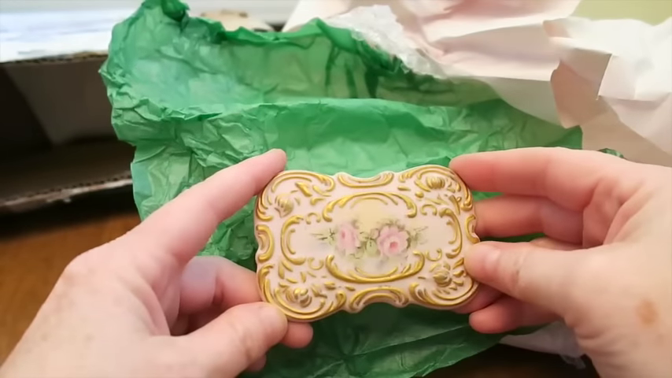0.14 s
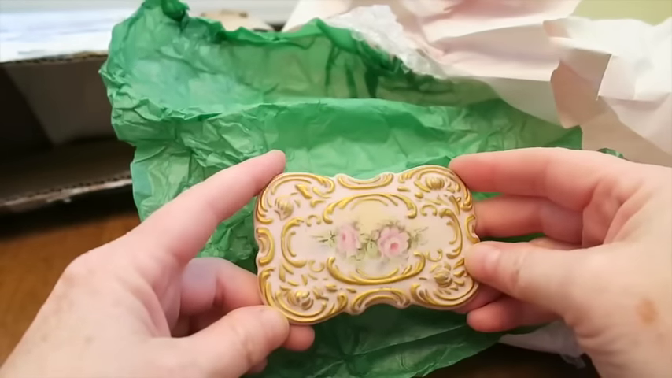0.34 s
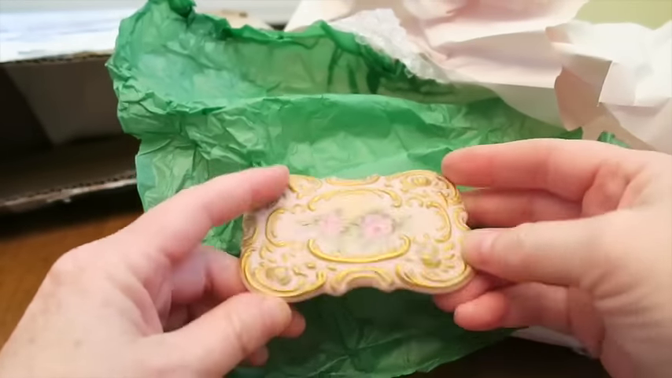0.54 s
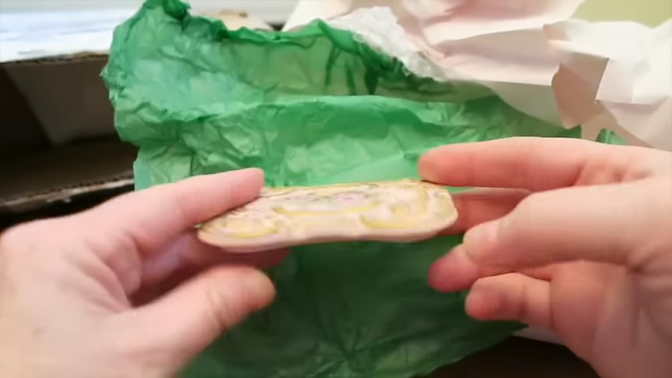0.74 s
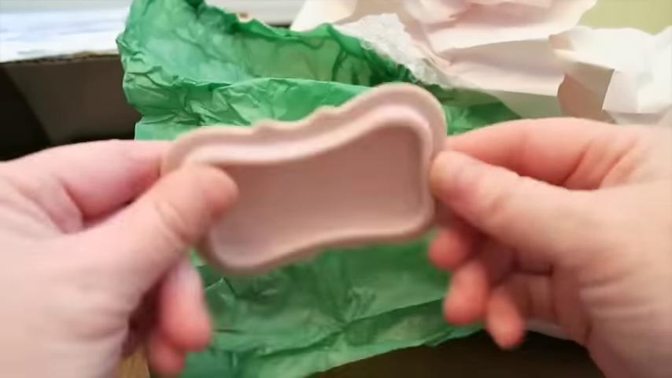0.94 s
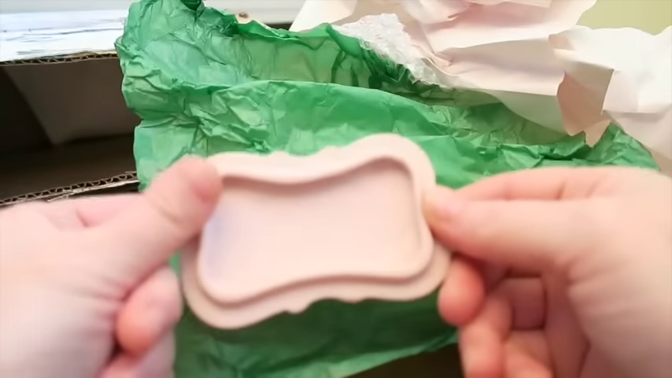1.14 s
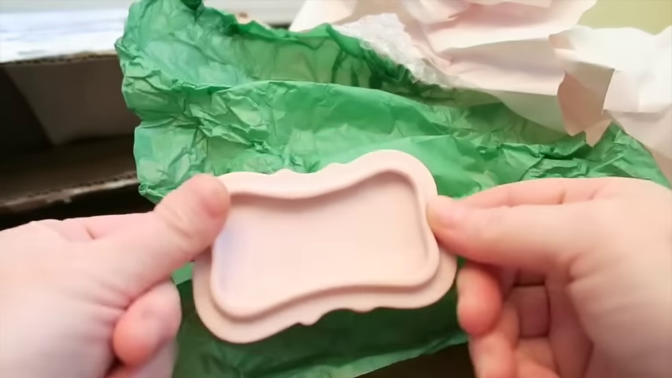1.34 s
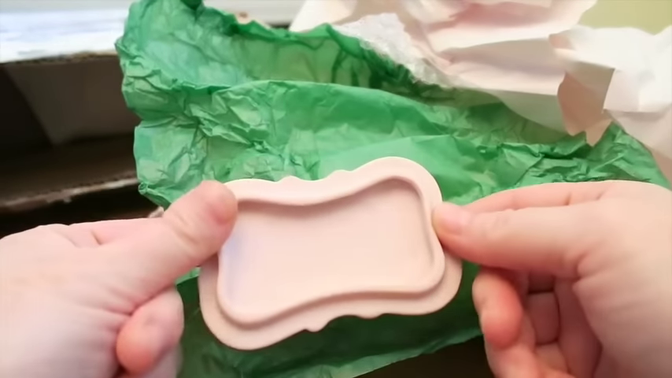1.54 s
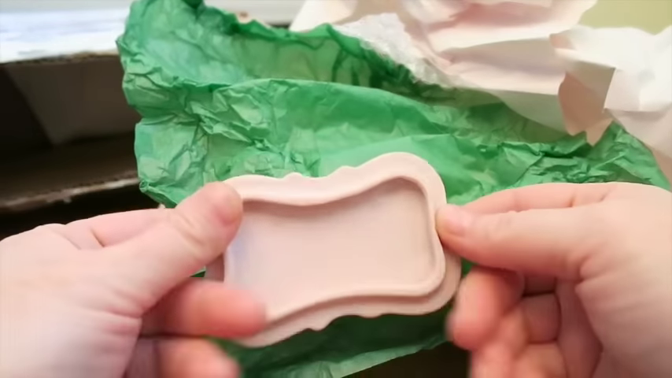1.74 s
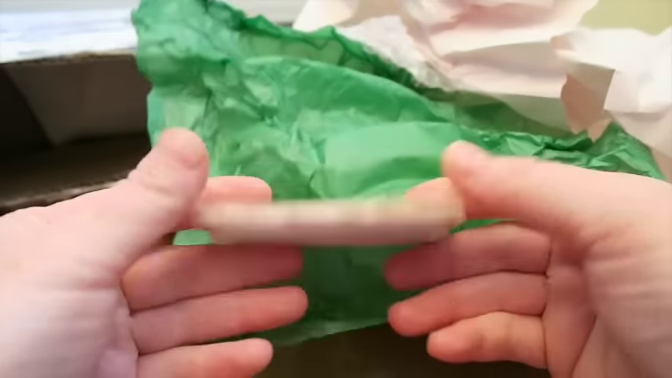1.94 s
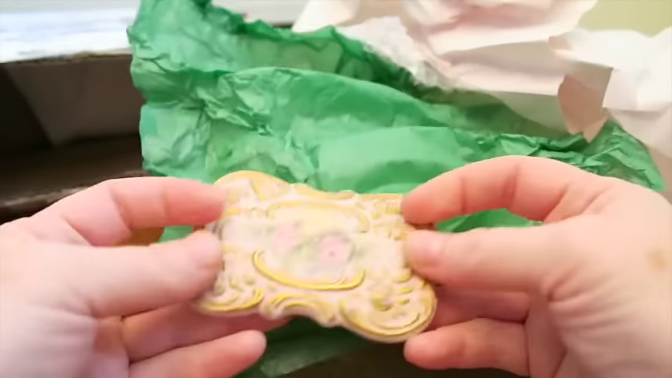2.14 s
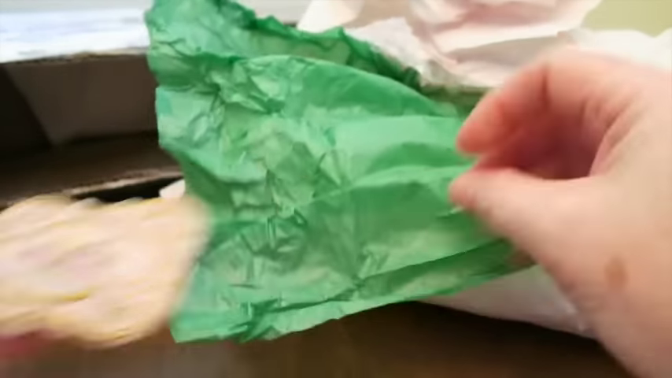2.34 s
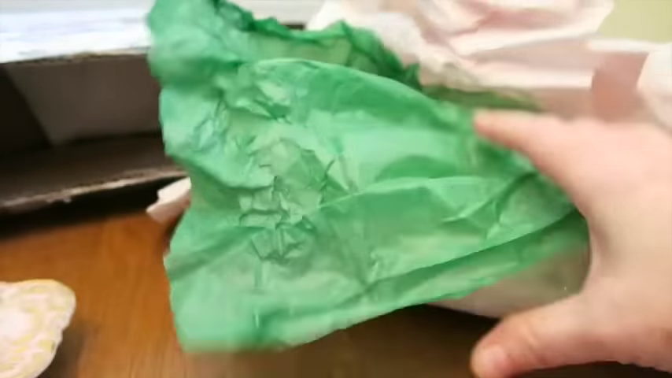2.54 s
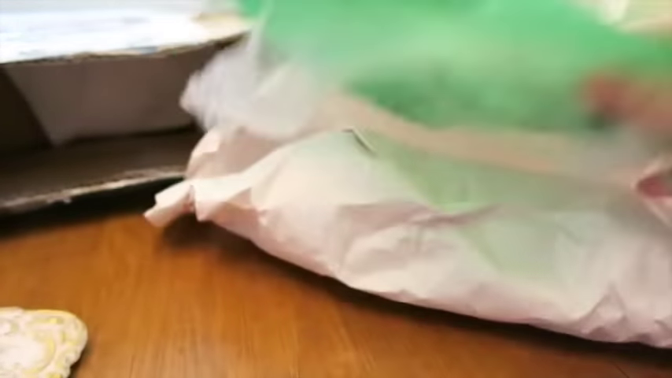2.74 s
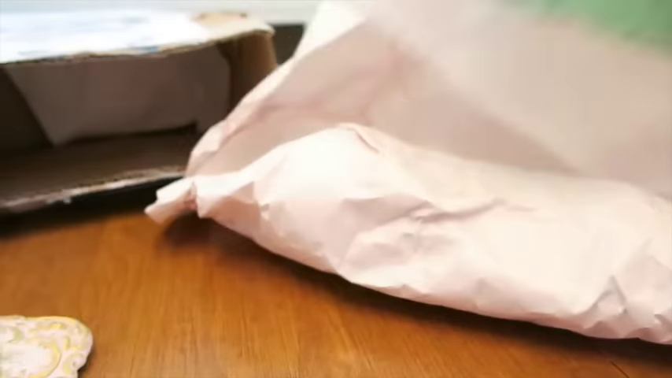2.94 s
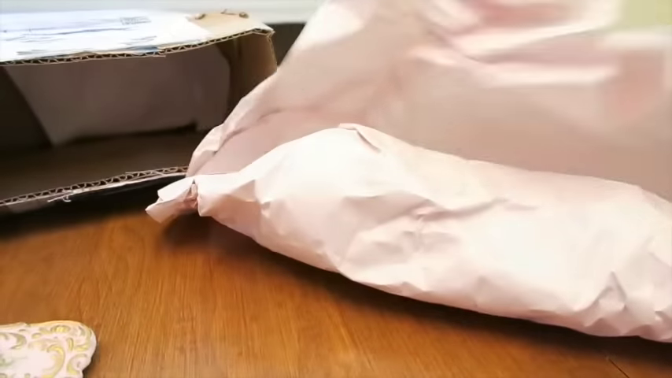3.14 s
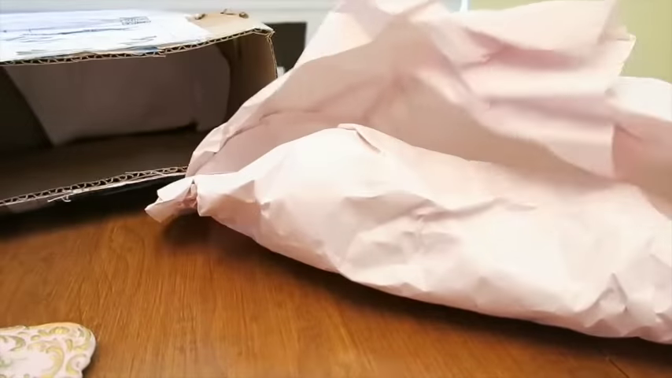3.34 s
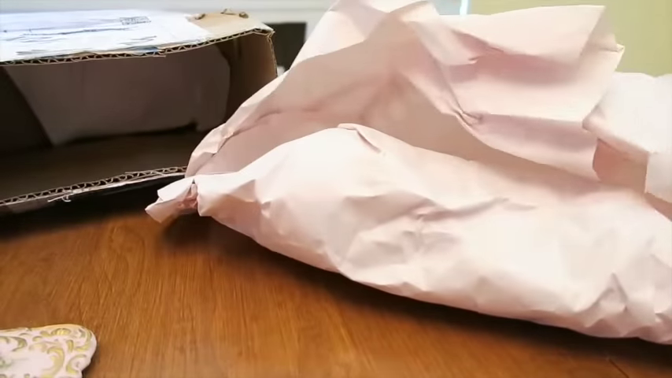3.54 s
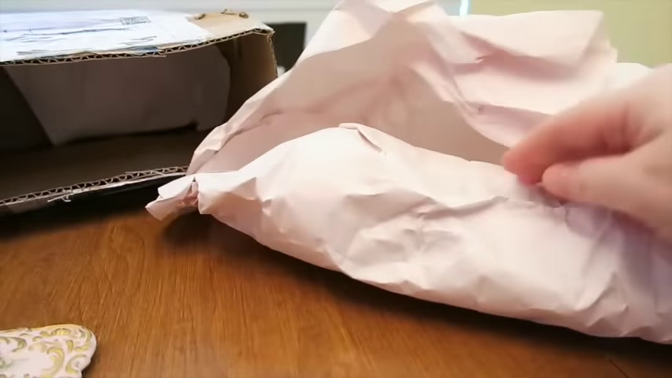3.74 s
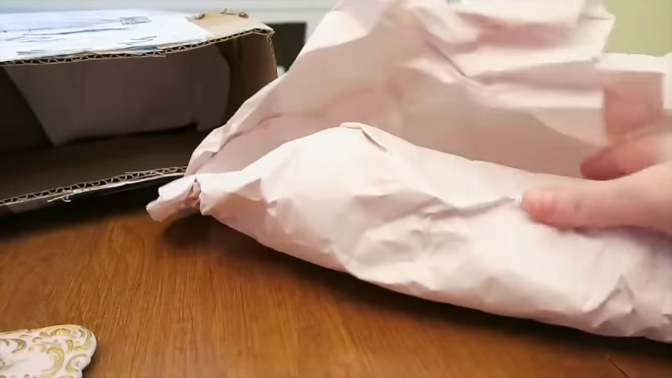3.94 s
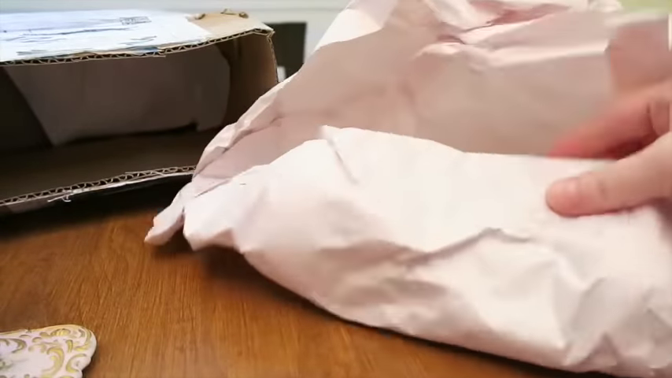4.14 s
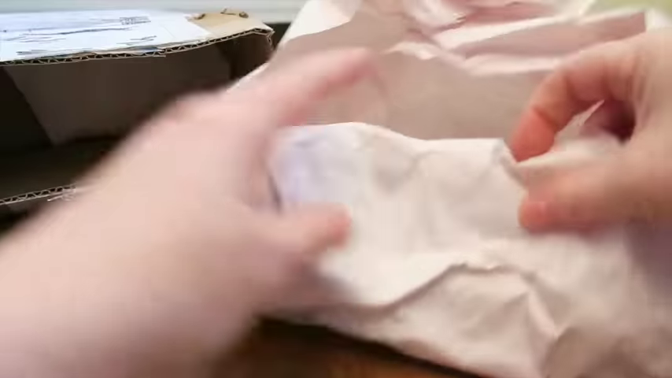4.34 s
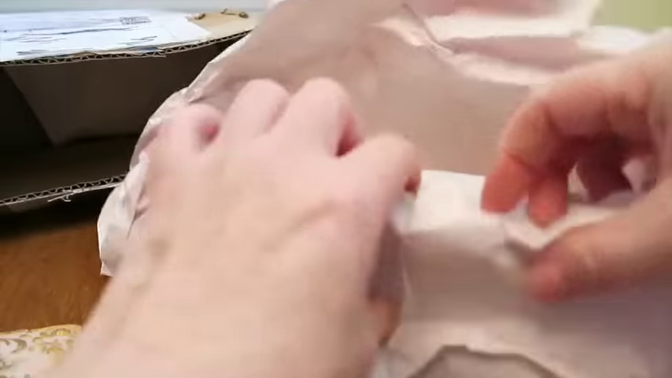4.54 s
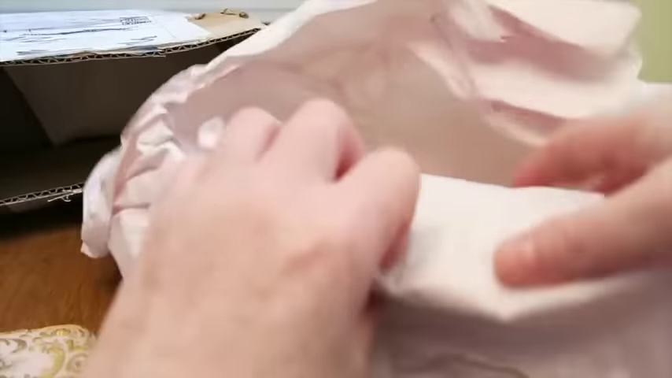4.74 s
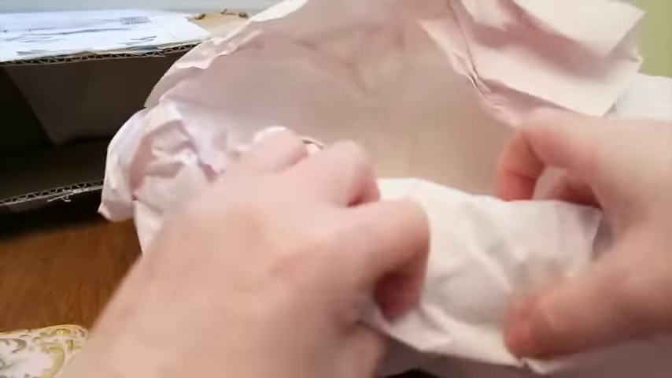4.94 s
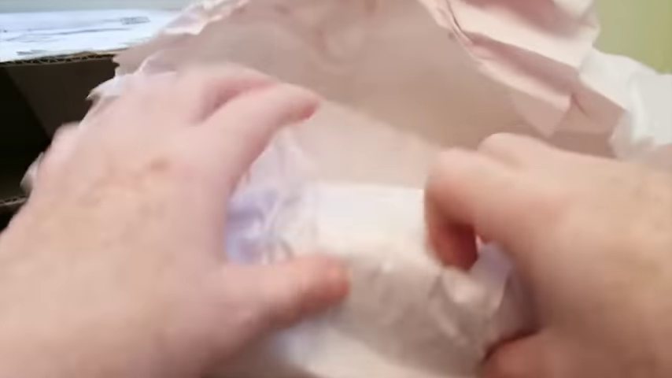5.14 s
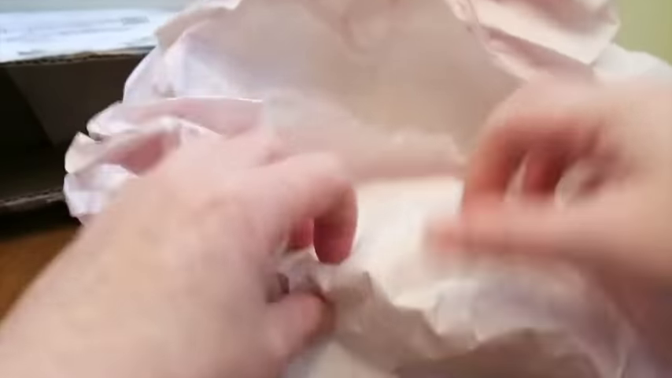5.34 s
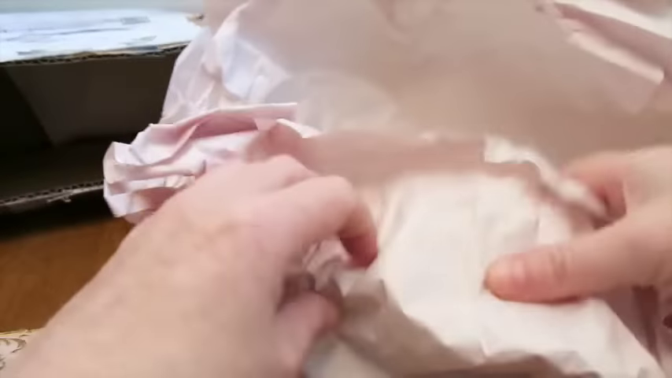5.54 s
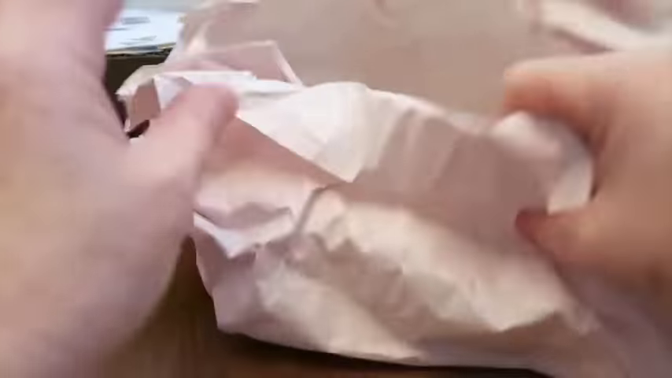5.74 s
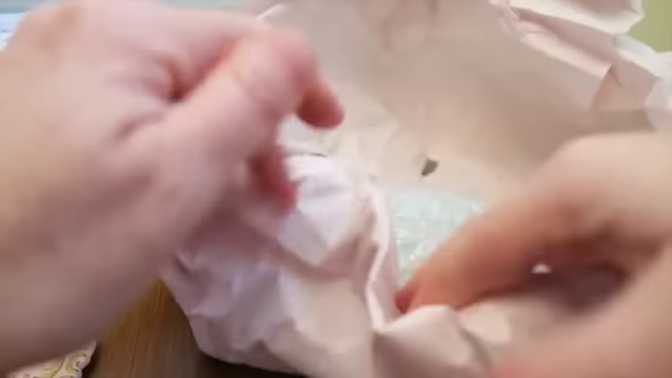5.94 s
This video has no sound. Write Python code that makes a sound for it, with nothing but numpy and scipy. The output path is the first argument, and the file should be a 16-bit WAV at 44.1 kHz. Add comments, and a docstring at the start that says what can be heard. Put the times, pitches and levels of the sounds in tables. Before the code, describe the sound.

Faint tissue rustles and ticks, a hard tap on a table, a papery sweep and bump, then dense, sharp crackling of stiff wrapping paper.

```python
"""A wooden table in a small, low-humming room: hands turn a porcelain lid over tissue paper, then sweep it aside.
Rustle is filtered noise gated by crackle, with small facet rings and fibre clicks; creases add single bursts.
The table answers bumps with damped modes and knocks with band-limited jumps.
Last, a bundle of stiff packing paper is pulled open: cracks and swinging facets snap over a dense crackle.
"""
import sys
import numpy as np
from scipy import signal
from scipy.fft import rfft, irfft, next_fast_len
from scipy.io import wavfile

SR = 44100
rng = np.random.default_rng(int(sys.argv[2]) if len(sys.argv) > 2 else 0)


def log_audio(samples):
    """Write samples as a 16-bit WAV file to the path given in sys.argv[1]."""
    # one column per channel
    frames = np.atleast_2d(samples).T
    # limit to full scale, then quantise
    limited = np.clip(frames, -1, 1)
    pcm = np.round(limited * 32767).astype(np.int16)
    wavfile.write(sys.argv[1], SR, pcm)


N = 264861
TIME = np.arange(N) / SR

# All levels below are relative: the source that uses them may add a gain of its own.
# Spectrum of the room's rumble: frequency_hz, level_db
ROOM_COLOUR = [(50, -12.5), (90, -12), (135, 0.5), (178, -8), (242, -8), (302, -15), (377, -14.5),
               (520, -26), (865, -24.5), (1350, -30), (4500, -43.5), (15000, -60)]
# Spectrum of slow air pressure: frequency_hz, level_db
DRAUGHT_COLOUR = [(12, -25), (25, 4), (52, 13.5), (85, 3.5), (130, 12), (250, -54)]
# Spectrum of tissue rustle: frequency_hz, level_db
TISSUE_COLOUR = [(88, -30), (150, 2.5), (235, -6), (270, -0.5), (341, -2), (589, -10), (774, -5), (837, -4),
                 (905, -5), (1190, -9.5), (2270, -11), (4950, -17), (11900, -28), (16000, -42)]
# Spectrum of stiff wrapping rustle: frequency_hz, level_db
WRAPPING_COLOUR = [(88, -39), (150, -2), (334, 5.5), (457, 3), (624, -11), (675, -1.5), (960, 1),
                   (1170, -2.5), (1360, -8.5), (1830, -5.5), (3770, -14.5), (9260, -26), (11900, -27),
                   (14500, -36), (16000, -50)]
# Stereo width of the noise in the room, brushed tissue, swept tissue and wrapping:
# frequency_hz, side_minus_mid_db
ROOM_WIDTH = [(30, -27), (130, -15.5), (400, -2), (2000, -6), (8000, -2)]
BRUSH_WIDTH = [(150, -13), (800, -16), (2400, -48), (4400, -27), (8000, -4.5), (14000, 4)]
TISSUE_WIDTH = [(150, -15), (400, -8), (800, -14), (2400, -10), (4400, -6), (8000, -0.5), (14000, 6)]
WRAPPING_WIDTH = [(150, -68), (400, -11.5), (800, -36), (2400, -20), (4400, -11.5), (8000, -3.5),
                  (14000, -2.5)]
# Bands of flutter, rustle and hiss: low_hz, high_hz
REGISTERS = [(170, 600), (600, 2500), (2500, 16000)]

# Course of the deep rumble: time_s, level_db
RUMBLE = [(0, -45), (2.3, -47), (3.45, -45), (3.56, -60), (5.4, -67), (5.7, -39), (6.0, -62)]
# Air pushed by the moving sheet: start_s, rise_s, hold_s, level_db
PUFFS = [(2.328, 0.042, 0.52, -46), (2.93, 0.033, 0.51, -41.5)]
# Resonances of the table top: frequency_hz, level_db, t60_s
TABLE_MODES = [(206, 0.5, 0.17), (336, 9.5, 0.063), (394, -1, 0.12), (439, -1.5, 0.13), (825, -3, 0.12),
               (886, -7, .1), (980, 1, 0.08), (1083, -4, 0.08), (1260, 0, .05), (1380, -6, 0.05),
               (1460, -1, 0.06), (1530, -5, 0.05), (1856, -5, 0.05), (2270, -1, .05)]
# Bumps on the table, a softer contact having a lower cutoff: start_s, level_db, lowpass_hz
BUMPS = [(2.8455, -19, 3400), (2.852, -21.5, 2200), (2.862, -25.5, 1700), (3.195, -22.5, 450),
         (3.292, -23.5, 610), (3.441, -25, 400), (3.959, -21, 3200), (3.9612, -15, 2420),
         (3.976, -20, 2000), (3.9795, -19, 2100), (3.987, -20, 2570), (4.003, -27, 2200),
         (4.021, -37, 2200)]
# Hard knocks on the table, first the lid, then the bundle: start_s, pitch_hz, level_db
KNOCKS = [(2.696, 1130, -7), (2.7022, 1070, -24), (2.8448, 1270, -9), (2.8452, 2300, -16),
          (2.8466, 1440, -15.5), (3.9616, 1290, -7.5)]
# Dull drumming as the bundle is shoved: start_s, rise_s, hold_s, level_db
SHOVES = [(5.067, 0.021, 0.082, -37.5), (5.503, 0.027, 0.055, -35.5), (5.746, 0.034, 0.021, -31.5)]
# Edges that rasp or squeak: centre_s, half_length_s, pitch_hz, pitch_wander_hz, level_db
RUBS = [(0.811, 0.008, 3170, 300, -35), (0.848, 0.02, 3100, 380, -32.5), (0.851, 0.028, 5400, 400, -42),
        (0.863, 0.018, 3950, 320, -34.5), (2.153, 0.0031, 4900, 110, -34), (3.046, 0.018, 840, 8, -24.5)]
# Hands brushing the tissue: start_s, rise_s, hold_s, level_db, brightness_db
BRUSHES = [(0.447, 0.084, 0.18, -44, -4), (0.739, 0.014, 0.088, -45, -2.5), (0.793, 0.05, 0.026, -39.5, 0),
           (0.896, 0.021, 0.074, -46, -4), (1.054, 0.014, 0.14, -50.5, -2), (1.863, 0.018, 0.043, -48, -7),
           (1.944, 0.079, 0.066, -40, -0.5), (2.093, 0.029, 0.14, -48, -3), (2.293, 0.14, 0.039, -36, -0.5),
           (2.534, 0.013, 0.099, -35, -1)]
# The sheet swept aside and sinking down: time_s, level_db, brightness_db
SWEEP = [(2.69, -33.5, -3.5), (2.8, -33.5, 4), (2.91, -33, -4), (3.0, -34.5, -1.5), (3.15, -29.5, -1.5),
         (3.26, -36, -1), (3.45, -33.5, -2), (3.56, -44, -2.5), (3.8, -54, 0)]
# Small ticks of the tissue: start_s, pitch_hz, level_db
TICKS = [(0.007, 2500, -32.5), (0.069, 5000, -41), (0.1483, 4330, -31), (0.2304, 5500, -54),
         (0.3948, 3960, -32), (0.413, 6000, -39), (0.4828, 5470, -35), (0.5837, 4800, -28),
         (0.59, 5970, -28), (0.619, 3220, -26.5), (0.6843, 4500, -28), (0.7043, 3800, -33),
         (0.7322, 2500, -27), (0.749, 6500, -32), (0.7562, 5700, -23.5), (0.8071, 3200, -36),
         (0.8249, 5200, -33), (0.841, 4000, -22), (0.8475, 3400, -22), (0.8555, 3570, -25),
         (0.8655, 4000, -19), (0.8765, 3700, -26), (0.9158, 4200, -21.5), (0.929, 5700, -28),
         (0.9429, 6000, -28), (0.9667, 5000, -40), (1.0072, 4500, -37), (1.1154, 4500, -37),
         (1.1209, 4480, -29), (1.1618, 5500, -33), (1.4112, 3280, -38), (1.508, 5500, -36),
         (1.623, 3280, -33), (1.7295, 4000, -42), (1.8769, 4300, -39), (1.9152, 4500, -34),
         (1.929, 5000, -29), (1.9926, 4500, -29), (2.0171, 4500, -32), (2.0392, 5200, -21),
         (2.048, 5000, -21), (2.151, 4300, -28), (2.1948, 4900, -23), (2.208, 6300, -28),
         (2.254, 4300, -33), (2.3369, 4000, -33), (2.4207, 4400, -22), (2.451, 3600, -17.5),
         (2.548, 4450, -19), (2.5571, 4000, -15), (2.565, 4000, -21), (2.6007, 4440, -20.5),
         (2.7317, 4200, -15), (2.8064, 4200, -14), (3.0379, 4000, -22), (3.0843, 4000, -26),
         (3.4845, 3980, -27), (3.8217, 4000, -32)]
# How hard the stiff wrapping is pulled: time_s, level_db, brightness_db
PULL = [(3.81, -44.5, -11), (3.84, -33.5, -2.5), (4.0, -30.5, -2), (4.14, -31, -3.5), (4.64, -28.5, -3),
        (4.71, -28, -1.5), (4.89, -24.5, -4), (5.01, -38, 7), (5.14, -22.5, -8.5), (5.37, -32, 0.5),
        (5.49, -23.5, -2.5), (5.575, -32, -1.5), (5.65, -28.5, 0), (5.79, -21, -5.5), (5.86, -37, -3),
        (5.91, -37.5, -3.5), (6.0, -22, -7)]
# Fingers crushing a handful of folds: start_s, rise_s, hold_s, level_db, brightness_db
CRUSHES = [(4.238, 0.01, 0.034, -27, -5.5), (4.41, .015, 0.087, -35.5, -28), (4.505, .006, 0.026, -25, -15),
           (4.576, .01, 0.033, -29, -0.5), (4.824, 0.011, 0.026, -18.5, -4),
           (4.946, 0.023, 0.025, -20, -5.5), (5.028, .012, 0.071, -24.5, -6.5),
           (5.16, 0.014, 0.039, -27.5, -4), (5.302, 0.017, 0.015, -21, -3), (5.388, 0.017, 0.03, -28, 1.5),
           (5.595, 0.0071, 0.031, -26.5, -3.5), (5.69, .01, 0.01, -32, 1), (5.765, 0.024, 0.01, -16.5, 1.5)]
# Broad wrapping panels popping through: start_s, pitch_hz, level_db
POPS = [(4.405, 473, -16.5), (4.458, 420, -22), (4.677, 493, -19), (4.86, 402, -15.5), (5.181, 430, -12.5),
        (5.233, 310, -7), (5.794, 443, -14.5)]
# Loudest buckling creases: start_s, facet_hz, facet_db, crack_db, crack_hz
SNAPS = [(0.5288, 1290, -23, -50.0, 2600), (0.5754, 1000.0, -32, -42, 3000),
         (0.6839, 1100.0, -30.5, -44, 4900), (0.8912, 1250, -26, -31, 3400),
         (1.0739, 1200.0, -37.0, -38.5, 3400), (1.961, 1450.0, -27, -33, 2750),
         (2.1513, 1190, -33, -38, 4400), (2.1968, 1200.0, -35, -40.0, 3900), (2.4592, 1310, -31, -29, 3400),
         (2.6224, 1050.0, -28, -36.0, 4100), (2.9565, 1920.0, -26, -23, 3300),
         (2.9725, 1310.0, -45, -28, 3200), (3.097, 1210.0, -28.0, -25, 3800),
         (3.117, 1410.0, -30, -23, 4300), (3.1415, 1590, -20, -30, 3500), (3.296, 970, -21.0, -25.0, 3500),
         (3.8965, 1020, -23.5, -23.5, 3550), (4.0897, 1100.0, -34.0, -27.0, 3380),
         (4.1178, 1190, -23, -36, 3400), (4.131, 1420, -22, -38, 2900), (4.1775, 1210.0, -23.5, -29, 3370),
         (4.2018, 990, -18.5, -22.5, 3300), (4.2498, 1190, -19.5, -25, 4000),
         (4.2641, 1180, -30, -23, 3200), (4.2869, 1320, -16, -12, 3440), (4.3546, 1000.0, -27.0, -20, 4220),
         (4.3587, 890, -17.0, -20, 2980), (4.3886, 1130.0, -40, -22.5, 3260),
         (4.41, 1142, -29, -18.0, 3700), (4.425, 1090, -21, -29, 4000), (4.4703, 1000, -20, -6.0, 3520),
         (4.4871, 1060.0, -13, -32, 2800), (4.5066, 1700, -11, -22, 3370), (4.5195, 1090, -19, -22, 3900),
         (4.5285, 1100.0, -26, -11.5, 3720), (4.531, 950.0, -7.0, -16.5, 3900),
         (4.5429, 1120.0, -21, -17, 3300), (4.5587, 1100.0, -21, -27.0, 3000),
         (4.5931, 1212, -18.5, -30, 3300), (4.5963, 1520, -18, -12.0, 4000),
         (4.6166, 1200.0, -18, -19, 3300), (4.631, 1060, -15.5, -23, 3300), (4.66, 1010, -14.0, -21, 4100),
         (4.6844, 1200.0, -34, -21, 3500), (4.7272, 1210, -32, -24, 3500),
         (4.7435, 1300.0, -29, -18.5, 3300), (4.766, 1010.0, -11.5, -19, 3600),
         (4.798, 1450.0, -16, -15, 2760), (4.832, 1130, -12.5, -12, 3140), (4.845, 1530, -13, -13.0, 3700),
         (4.8505, 1290.0, -20.0, -20.0, 3300), (4.8597, 1130, -12, -18, 3200),
         (4.8748, 1300.0, -25, -13, 4500), (4.8883, 1170, -11, -17, 3700),
         (4.9157, 1200.0, -35, -21.0, 3200), (4.9207, 1010.0, -7.5, -35.0, 3200),
         (4.9438, 1205.0, -31, -21.0, 2800), (4.958, 1200.0, -26.0, -20.0, 4080),
         (4.9756, 1070, -16, -12, 4000), (4.9812, 1160, -12.5, -24.0, 3500), (4.9905, 970, -8, -21, 3600),
         (4.9932, 1130, -5.5, -11.5, 3720), (5.027, 960, -15, -24, 3500), (5.0506, 1100.0, -16, -29, 3320),
         (5.0779, 930.0, -11.5, -20, 3800), (5.0914, 1100.0, -15, -30, 3100),
         (5.1189, 1100.0, -27.0, -21.5, 3500), (5.136, 1100.0, -21, -27, 3800),
         (5.1539, 1100.0, -16.0, -28.0, 3300), (5.1656, 1100.0, -19, -17.5, 3950),
         (5.1835, 1100.0, -28, -19, 3900), (5.1922, 1160.0, -20.0, -23, 3000),
         (5.2228, 1140.0, -11, -14.5, 3320), (5.2348, 1110, -9, -12.0, 4100),
         (5.2562, 1130, -15.5, -21, 3420), (5.2872, 1200.0, -18.5, -21, 3020),
         (5.3255, 1200.0, -27, -21.0, 3800), (5.3342, 1030.0, -13.5, -22, 4000),
         (5.3779, 1150, -13.5, -15.5, 4200), (5.3978, 1200.0, -30, -27, 3900),
         (5.4247, 1100.0, -18, -24.0, 2900), (5.4544, 1170, -14.5, -14, 3800),
         (5.4867, 1320.0, -25, -16, 4340), (5.5409, 1200.0, -29, -19, 4770),
         (5.5541, 985, -19.5, -29, 3400), (5.5903, 1330.0, -27, -19.5, 4600),
         (5.612, 1350, -20, -15.0, 3800), (5.6241, 1090, -20.0, -32, 3500),
         (5.6623, 1110, -19.5, -30, 3500), (5.6972, 980.0, -14, -21.0, 3540),
         (5.7045, 1170, -24, -16, 3400), (5.7138, 1210.0, -33.0, -12, 5500),
         (5.7245, 1520, -17, -12.5, 3100), (5.7497, 1630, -17, -13, 2770),
         (5.7568, 1410.0, -30, -11.5, 3740), (5.7705, 950.0, -14.0, -19.0, 3400),
         (5.7888, 880, -17, -12, 3200), (5.7918, 1100, -34, -31, 3800), (5.798, 1280.0, -33, -11.0, 2850),
         (5.8052, 950.0, -15.5, -9, 2950), (5.8278, 900.0, -28, -20, 4200),
         (5.8392, 1560, -23.5, -17.5, 3460), (5.8529, 1620, -25, -38.0, 3600),
         (5.9215, 1190.0, -27, -27, 3400), (5.9291, 1290.0, -39, -23.5, 2900),
         (5.9587, 1100, -15, -22.5, 2800), (5.971, 1210.0, -36, -22.0, 3300),
         (5.992, 1400, -19.5, -20.0, 3500)]

CUTOFF_HZ = 15700
ROOM_T60_S = 0.35
NARROW_FROM_S, NARROW_OVER_S, NARROW_BELOW_HZ = 3.52, 0.04, 330
SETTLING_DB, SETTLING_BRIGHT_DB = -60.5, -13.5   # the tissue left alone
TISSUE_FLUTTER_DB, WRAPPING_FLUTTER_DB = -3.5, -6   # big facets relative to the rustle
FLUTTER_TRADE = 0.41   # dB of flutter lost per dB of brightness
FLAP_HZ = (8.8, 43.3)   # how fast a loose sheet flaps
MOVE_ATTACK_S = 0.026   # a long movement gets going
BRUSH_RELEASE_S, CRUSH_RELEASE_S, PUFF_RELEASE_S = 0.035, 0.011, 0.043
SHOVE_LOW_HZ, SHOVE_HIGH_HZ, SHOVE_RELEASE_S = 47.6, 142.5, 0.033
RUB_CATCHES_PER_S, RUB_CATCH_SHARE = 240, 0.25
KNOCK_SPREAD, KNOCK_RATTLE_SHARE, KNOCK_RATTLE_S = 1.37, 0.12, 0.0022
POP_DECAY_S, POP_SPREAD = 0.0027, 1.61
TICK_HZ, TICK_SCATTER_OCT = 4240, 0.77
STRAY_TICK_DB = 15   # fine ticks relative to the hiss of their brush
CRACK_HZ, CRACK_SCATTER_OCT = 3030, 0.43   # lesser creases
LESSER_FACET_HZ, LESSER_SCATTER_OCT = 950, 0.27
LESSER_FACET_DB, LESSER_CRACK_DB, LESSER_SPREAD_DB = 4.5, -1.5, 3   # first two relative to the pull
OVERTONE_RATIO, OVERTONE_CYCLES = 1.54, 0.56   # decay counted in swings of the first mode
# A harder crease cracks shorter and broader, with more of it in one jump; these hold at the typical level
CRACK_S, CRACK_SPREAD, JUMP_SHARE = 0.0021, 1.24, 0.26
TYPICAL_CRACK_DB, HARDNESS_DOUBLES_DB = -27, 28


def from_db(db):
    """Logarithmic level: decibels become an amplitude ratio."""
    return 10 ** (np.asarray(db) / 20)


def rms_one(x):
    """Power normalisation: the mean square becomes one."""
    return x / np.sqrt(np.mean(x ** 2) + 1e-20)


def butter(x, hz, kind, order=2):
    """Causal filtering with a maximally flat passband."""
    corners = np.clip(hz, 10, 0.48 * SR)
    return signal.sosfilt(signal.butter(order, corners, kind, fs=SR, output="sos"), x)


def gain_at(points, hz):
    """Spectral envelope: dB interpolated over log frequency, as amplitude gain."""
    f, db = np.transpose(points)
    return from_db(np.interp(np.log(hz + 1), np.log(f), db))


def tint(x, colour):
    """Spectral shaping: multiply the transform by a table of gains."""
    padded = next_fast_len(x.shape[-1] + 2048)
    hz = np.arange(padded // 2 + 1) * SR / padded
    return irfft(rfft(x, padded) * gain_at(colour, hz), padded)[..., :x.shape[-1]]


def stereo_noise(width, size=N):
    """Spatial coherence: mid and side noise make two ports differ by frequency."""
    mid, side = rng.standard_normal((2, size))
    side = tint(side, width)
    return np.array([mid + side, mid - side])


def at_ports(x, lead_us, scatter_us):
    """Arrival-time difference: a phase slope shifts the second port by a scattered lead."""
    lead_s = (lead_us + scatter_us * rng.standard_normal()) * 1e-6
    hz = np.arange(len(x) // 2 + 1) * SR / len(x)
    return np.array([x, irfft(rfft(x) * np.exp(-2j * np.pi * hz * lead_s), len(x))])


def add(out, s, sound):
    """Superposition: a short sound is summed in at its time."""
    start = int(np.clip(round(s * SR), 0, N - 1))
    out[..., start:start + sound.shape[-1]] += sound[..., :N - start]


def burst(x, db):
    """Energy scaling: a short sound gets the energy of 2 ms at this level."""
    return x * from_db(db) * np.sqrt(0.002 * SR / np.sum(x ** 2))


def gesture(s, rise_s, hold_s, release_s):
    """Movement envelope: linear rise, hold, exponential release."""
    out = np.zeros(N)
    t = np.arange(int((rise_s + abs(hold_s) + 10 * release_s) * SR)) / SR
    release = np.exp(-np.maximum(t - rise_s - hold_s, 0) / release_s)
    add(out, s, np.minimum(t / rise_s, 1) * release)
    return out


def crackle(per_s, spread_db, decay_s):
    """Shot noise: random buckles of uneven size, each decaying at once; mean power 1."""
    born = rng.random(N) < per_s / SR
    power = born * from_db(spread_db * np.minimum(rng.exponential(1, N), 3.5)) ** 2
    power = signal.lfilter([1], [1, -np.exp(-2 / (decay_s * SR))], power + 1e-12)
    return power / power.mean()


def room_tone(rumble_db, hum_db, hum_hz, hum_width_hz):
    """Filtered noise: a low ventilation-like rumble, and a band so narrow that it wavers as a hum."""
    rumble = rms_one(tint(stereo_noise(ROOM_WIDTH), ROOM_COLOUR))
    band = [hum_hz - hum_width_hz / 2, hum_hz + hum_width_hz / 2]
    hum = butter(rng.standard_normal(N + SR), band, "band", order=1)[SR:]   # skip the filter's build-up
    return from_db(rumble_db) * rumble + from_db(hum_db) * rms_one(hum)


def draught(gain_db):
    """Slow air pressure, equal at both ports: deep rumble and sheet-driven puffs add in power."""
    power = from_db(np.interp(TIME, *np.transpose(RUMBLE))) ** 2
    for s, rise_s, hold_s, db in PUFFS:
        power += (from_db(db) * gesture(s, rise_s, hold_s, PUFF_RELEASE_S)) ** 2
    pressure = rms_one(tint(rng.standard_normal(N), DRAUGHT_COLOUR))
    return from_db(gain_db) * np.sqrt(power) * pressure


def room(x, early_db, early_s, late_db, t60):
    """Reverberation by convolution: quick scatter from table and box, then a small room's dull tail."""
    t = np.arange(SR // 2) / SR
    wall_colour = [(100, -17), (1000, -8.0), (4000, -5.5), (14000, -4.0)]
    walls = rms_one(tint(stereo_noise(ROOM_WIDTH, size=len(t)), wall_colour))
    early = np.exp(-t / early_s) * (t > 0.0015)
    late = from_db(-60 * t / t60) * (t > 0.007)
    early = from_db(early_db) * early / np.linalg.norm(early)
    late = from_db(late_db) * late / np.linalg.norm(late)
    return signal.fftconvolve(x, walls * (early + late), axes=1)[:, :N]


def narrow_bass(x):
    """Side-signal attenuation: the bass draws in to the middle and stays there."""
    side = (x[0] - x[1]) / 2
    deep_side = side - tint(side, [(NARROW_BELOW_HZ / 4, -24), (NARROW_BELOW_HZ, 0)])
    amount = np.clip((TIME - NARROW_FROM_S) / NARROW_OVER_S, 0, 1)
    return x - deep_side * amount * [[1], [-1]]


def bumps(ring_db, thud_db, thud_s, crunch_db, crunch_s):
    """Modal excitation: a thud rings the table top and crunches its paper; soft contacts are dull."""
    out, t = np.zeros(N), np.arange(SR // 2) / SR
    hz, mode_db, t60 = np.transpose(TABLE_MODES)[:, :, None]
    for s, db, soft_hz in BUMPS:
        strengths = from_db(mode_db + rng.normal(0, 1.0, hz.shape)) * rng.choice([-1, 1], hz.shape)
        ring = np.sum(strengths * np.sin(2 * np.pi * hz * t) * from_db(-60 * t / t60), axis=0)
        thud = butter(rng.standard_normal(len(t)) * np.exp(-t / thud_s), [230, 3000], "band")
        crunch = butter(rng.standard_normal(len(t)) * np.exp(-t / crunch_s), [850, 2600], "band")
        hit = from_db(ring_db) * ring + burst(thud, thud_db) + burst(crunch, crunch_db)
        add(out, s, from_db(db) * butter(hit, soft_hz, "low", order=3))
    return butter(out, 174, "high") * np.ones((2, 1))


def give_way(low_hz, high_hz, decay_s, jump_share):
    """Sudden release: one jump and a dying run of small slips, shared by power in one band."""
    t = np.arange(1024) / SR
    slips = rng.standard_normal(len(t)) * np.exp(-t / decay_s) * (1 - np.exp(-t / 0.00023))
    jump = (t == 0) * rng.choice([-1., 1.])
    share = np.clip(jump_share, 0, 0.9)
    jump, slips = butter(np.array([jump, slips]), [low_hz, high_hz], "band")
    return np.sqrt(share) * rms_one(jump) + np.sqrt(1 - share) * rms_one(slips)


def knocks(gain_db):
    """Hard impact on wood: a heavily damped swing with a slight rattle."""
    out = np.zeros((2, N))
    for s, hz, db in KNOCKS:
        low_hz, high_hz = hz / KNOCK_SPREAD, hz * KNOCK_SPREAD
        knock = give_way(low_hz, high_hz, KNOCK_RATTLE_S, KNOCK_RATTLE_SHARE)
        add(out, s, at_ports(burst(knock, db + gain_db), lead_us=38, scatter_us=3.5))
    return out


def shoves():
    """Sliding friction: low-band noise swells as the bundle drags over the wood."""
    level = sum(from_db(db) * gesture(s, rise_s, hold_s, SHOVE_RELEASE_S)
                for s, rise_s, hold_s, db in SHOVES)
    return level * rms_one(butter(rng.standard_normal(N), [SHOVE_LOW_HZ, SHOVE_HIGH_HZ], "band"))


def rubs():
    """Stick-slip: tones swell and fade, catching as they go; pitch wander makes a squeak a rasp."""
    out, t = np.zeros(N), np.arange(-SR // 10, SR // 10) / SR
    for s, length_s, hz, wander_hz, db in RUBS:
        pitch = hz + wander_hz * rms_one(butter(rng.standard_normal(len(t)), 510, "low"))
        tone = np.sin(2 * np.pi * np.cumsum(pitch) / SR)
        add(out, s + t[0], from_db(db) * np.exp(-(t / length_s) ** 2) * tone)
    share = np.clip(RUB_CATCH_SHARE, 0, 1)
    catches = crackle(RUB_CATCHES_PER_S, spread_db=-3.0, decay_s=0.0055)
    return out * np.sqrt(1 - share + share * catches)


def register_gains(db, bright_db, flutter_db):
    """Spectral balance of flutter, rustle and hiss: brighter movement swings the big facets less."""
    flutter = db + flutter_db - FLUTTER_TRADE * bright_db
    return from_db([flutter, db, db + bright_db]).reshape(3, -1)


def long_movement(curve, release_s, flutter_db):
    """Power envelope of one long movement, in each register."""
    s, db, bright_db = np.transpose(curve)
    moving = gesture(s[0] - MOVE_ATTACK_S, MOVE_ATTACK_S, s[-1] - s[0], release_s)
    gains = register_gains(np.interp(TIME, s, db), np.interp(TIME, s, bright_db), flutter_db)
    return (gains * moving) ** 2


def short_movements(gestures, release_s, flutter_db):
    """Power summation over short gestures, in each register."""
    shapes = np.array([gesture(start, rise_s, hold_s, release_s)
                       for start, rise_s, hold_s, _, _ in gestures])
    *_, db, bright_db = np.transpose(gestures)
    return register_gains(db, bright_db, flutter_db) ** 2 @ shapes ** 2


def moving_sheet(x, bounce, near_s, far_s):
    """Comb filtering: sound bounces off moving folds, so the wandering delay shifts the colour."""
    folds = rng.uniform(near_s, far_s, size=70)
    lag = np.interp(TIME, np.linspace(0, TIME[-1], len(folds)), folds)
    index = np.clip(np.round((TIME - lag) * SR).astype(int), 0, N - 1)
    return x + bounce * x[:, index]


def facets(count, spread_db, cycles):
    """Damped resonance: small facets ring a few cycles, each with its own pitch and place."""
    when, size, pitch, place = rng.random((count, 4)).T[:, :, None]
    step = np.arange(512)
    t = step / SR
    hz = np.geomspace(800, 12000, 1000)[(pitch * 1000).astype(int)]
    fade = np.exp(-t * hz / cycles) * (1 - step / len(step))
    swing = hz * from_db(-spread_db * np.log(size + 0.022)) * fade
    at = ((when * (N - len(step))).astype(int) + step).ravel()
    lag = 0.00001 + 0.00008 * (place - 0.5)   # seconds between the two ports
    return rms_one(np.array([np.bincount(at, (swing * np.sin(2 * np.pi * hz * (t - d))).ravel(), N)
                             for d in (0, lag)]))


def fibre_clicks(per_s, spread_db):
    """Impulsive release: fibres catch and let go in bare clicks, slightly apart at the ports."""
    sizes = from_db(spread_db * np.minimum(rng.exponential(1, N), 3)) * rng.choice([-1, 1], N)
    clicks = rms_one(sizes * (rng.random(N) < per_s / SR))
    return np.array([clicks, np.interp(TIME - 0.00002, TIME, clicks)])


def rustle(powers, colour, width, gains_db, per_s, spread_db, decay_s, sliding, ringing, clicking, flap_db):
    """Friction and buckling: sliding hiss, crackle and flapping; big slow facets low, small quick ones high."""
    noise = moving_sheet(rms_one(stereo_noise(width)), bounce=0.37, near_s=0.0003, far_s=0.0009)
    rings = ringing * facets(count=1500, spread_db=2.0, cycles=4.7)
    rings = rings + clicking * fibre_clicks(per_s=600, spread_db=3.5)
    shared = crackle(per_s, spread_db, decay_s)
    sliding, out = np.clip(sliding, 0, 1), 0
    for k, (band, power, gain_db) in enumerate(zip(REGISTERS, powers, gains_db)):
        # higher registers crackle more often and die sooner
        own = crackle(per_s * 2. ** (k - 2), spread_db, decay_s * 2. ** (1 - k))
        flap = from_db(flap_db * rms_one(butter(rng.standard_normal(N), FLAP_HZ, "band")))
        gate = np.sqrt(sliding + (1 - sliding) * (shared + own) / 2)
        grains = tint(noise * gate + rings, colour)
        grains = flap * butter(grains, band, "band", order=3)
        out = out + grains / grains.mean(axis=0).std() * np.sqrt(power) * from_db(gain_db)
    return out


def bounced(x, share, near_s, far_s):
    """Single reflection: a nearby fold returns the sound a moment later and colours it."""
    lag = max(int(rng.uniform(near_s, far_s) * SR), 1)
    return x + share * np.concatenate([np.zeros(lag), x[:-lag]])


def crack(hz, decay_s, spread, air_db, jump_share):
    """Crease failure: a burst around its own pitch, with a broadband edge."""
    spread = max(spread, 1.05)
    body = give_way(hz / spread ** 1.36, hz * spread ** 0.74, decay_s, jump_share)
    return body + from_db(air_db) * give_way(hz * 0.1, 12000, decay_s, jump_share)


def stray_ticks(count):
    """Random release: each brush sets off fine ticks, weaker while it is building up."""
    rows = []
    for s, rise_s, hold_s, db, bright_db in BRUSHES:
        after = (rise_s + hold_s) * (np.arange(count) + rng.random(count)) / count
        built_db = 20 * np.log10(np.clip(after / rise_s, 0.01, 1))
        hz = TICK_HZ * 2 ** (TICK_SCATTER_OCT * rng.standard_normal(count))
        rows += zip(s + after, hz, db + bright_db + built_db + STRAY_TICK_DB)
    return rows


def ticks(gain_db):
    """Crease failure in thin tissue: only the crack, with no body."""
    out = np.zeros((2, N))
    for s, hz, db in [*TICKS, *stray_ticks(count=3)]:
        tick = crack(hz, decay_s=0.0026, spread=1.39, air_db=-1.5, jump_share=0.33)
        tick = bounced(tick, share=0.47, near_s=0.00027, far_s=0.0009)
        add(out, s, at_ports(burst(tick, db + gain_db), lead_us=7.1, scatter_us=15.0))
    return out


def pops(gain_db):
    """Snap-through: a broad panel flips over with a short hollow thump."""
    out, t = np.zeros(N), np.arange(2048) / SR
    spread = max(POP_SPREAD, 1.05)
    for s, hz, db in POPS:
        flip = rng.standard_normal(len(t)) * np.exp(-t / POP_DECAY_S)
        add(out, s, burst(butter(flip, [hz / spread, hz * spread], "band"), db + gain_db))
    return out


def lesser_snaps(count):
    """Load-dependent buckling: lesser creases give way at uneven intervals, louder with the pull."""
    s, db, _ = np.transpose(PULL)
    when = s[0] + (s[-1] - s[0]) * (np.arange(count) + rng.random(count)) / count
    pitch, low, high, edge = rng.standard_normal((count, 4)).T
    pull_db = np.interp(when, s, db)
    facet_hz = LESSER_FACET_HZ * 2 ** (LESSER_SCATTER_OCT * pitch)
    facet_db = pull_db + LESSER_FACET_DB + LESSER_SPREAD_DB * low
    crack_db = pull_db + LESSER_CRACK_DB + LESSER_SPREAD_DB * high
    crack_hz = CRACK_HZ * 2 ** (CRACK_SCATTER_OCT * edge)
    return np.transpose([when, facet_hz, facet_db, crack_db, crack_hz])


def snaps(facet_db, crack_db, cycles, flutter, overtone):
    """Buckling: a crease cracks and flips its facet, which swings a few cycles with a brief overtone."""
    out, t = np.zeros((2, N)), np.arange(1024) / SR
    for s, facet_hz, low_db, high_db, crack_hz in [*SNAPS, *lesser_snaps(count=30)]:
        turns = t * facet_hz
        first = np.sin(2 * np.pi * turns) * np.exp(-turns / cycles)
        second = np.sin(2 * np.pi * OVERTONE_RATIO * turns) * np.exp(-turns / OVERTONE_CYCLES)
        swing = (first + overtone * second) * (1 - np.exp(-t / 0.00008)) * rng.choice([-1, 1])
        shake = rng.standard_normal(len(t)) * np.exp(-t / 0.0052)
        shake = butter(shake, [facet_hz / 2.12, facet_hz * 1.33], "band")
        facet = burst(burst(swing, 0) + flutter * burst(shake, 0), low_db + facet_db)
        hardness = 2 ** np.clip((high_db - TYPICAL_CRACK_DB) / HARDNESS_DOUBLES_DB, -0.5, 2)
        edge = crack(crack_hz, decay_s=CRACK_S / hardness ** 1.1, spread=CRACK_SPREAD * hardness ** 0.35,
                     air_db=-10, jump_share=JUMP_SHARE * hardness ** 2)
        edge = burst(bounced(edge, share=0.3, near_s=0.0005, far_s=0.0012), high_db + crack_db)
        add(out, s, at_ports(facet + edge, lead_us=19.3, scatter_us=6.7))
    # the bounce off the table hollows the low middle
    return out - 0.5 * butter(out, [510, 690], "band", order=1)


def scene():
    """Superposition of room air, table, tissue and wrapping, with the echoes of the close sounds."""
    settling = register_gains(SETTLING_DB, SETTLING_BRIGHT_DB, TISSUE_FLUTTER_DB) ** 2
    brushing = short_movements(BRUSHES, BRUSH_RELEASE_S, TISSUE_FLUTTER_DB)
    sweeping = long_movement(SWEEP, BRUSH_RELEASE_S, TISSUE_FLUTTER_DB)
    pulling = long_movement(PULL, CRUSH_RELEASE_S, WRAPPING_FLUTTER_DB)
    crushing = short_movements(CRUSHES, CRUSH_RELEASE_S, WRAPPING_FLUTTER_DB)
    fingers = rustle(settling + brushing, TISSUE_COLOUR, BRUSH_WIDTH, gains_db=(-0.3, -0.3, -0.3),
                     per_s=450, spread_db=3.0, decay_s=0.0042,
                     sliding=0.11, ringing=0.12, clicking=0.53, flap_db=0.5)
    tissue = rustle(sweeping, TISSUE_COLOUR, TISSUE_WIDTH, gains_db=(0.1, 0.1, 0.1),
                    per_s=680, spread_db=2.0, decay_s=0.0036,
                    sliding=0.55, ringing=0.11, clicking=0.41, flap_db=0.77)
    wrapping = rustle(pulling + crushing, WRAPPING_COLOUR, WRAPPING_WIDTH, gains_db=(-1.6, -3.7, -3.2),
                      per_s=480, spread_db=4.5, decay_s=0.0058,
                      sliding=0.26, ringing=0.21, clicking=0.68, flap_db=0.5)
    creases = snaps(facet_db=-1.8, crack_db=-3.2, cycles=2.8, flutter=0.89, overtone=0.5)
    creases = creases + ticks(gain_db=-10)
    table = knocks(gain_db=-3.8)
    table = table + bumps(ring_db=-6.5, thud_db=0.5, thud_s=0.0091, crunch_db=2.0, crunch_s=0.043)
    panels = pops(gain_db=-1.0) * from_db([[0.9], [-0.9]])   # slightly to the left
    close = creases + table + rubs() + panels + shoves()
    echoes = room(close, early_db=-16.5, early_s=0.017, late_db=-16.5, t60=ROOM_T60_S)
    air = room_tone(rumble_db=-40.5, hum_db=-51.5, hum_hz=132.9, hum_width_hz=2.6)
    air = air + draught(gain_db=1.5)
    return narrow_bass(fingers + tissue + wrapping + close + echoes + air)


def record(dry):
    """Band limiting and clipping: the microphone softens the top octave, peaks clip, the top is cut."""
    heard = np.clip(butter(dry, 14400, "low", order=4), -1, 1)
    return signal.sosfilt(signal.ellip(10, 0.1, 90, CUTOFF_HZ, fs=SR, output="sos"), heard)


dry = scene()
out = record(dry)
log_audio(out)
```